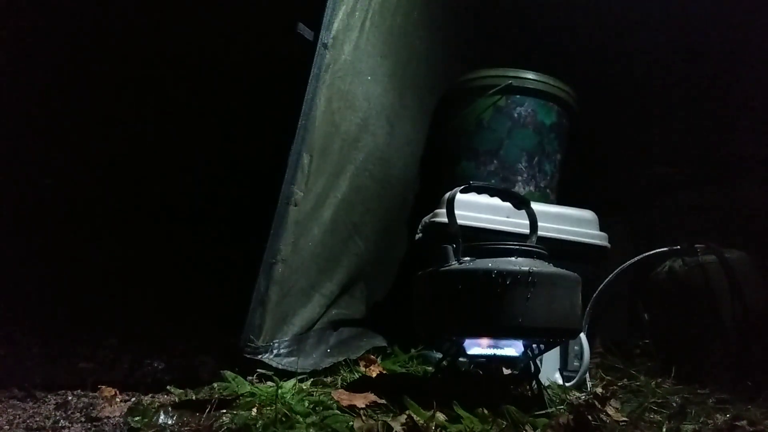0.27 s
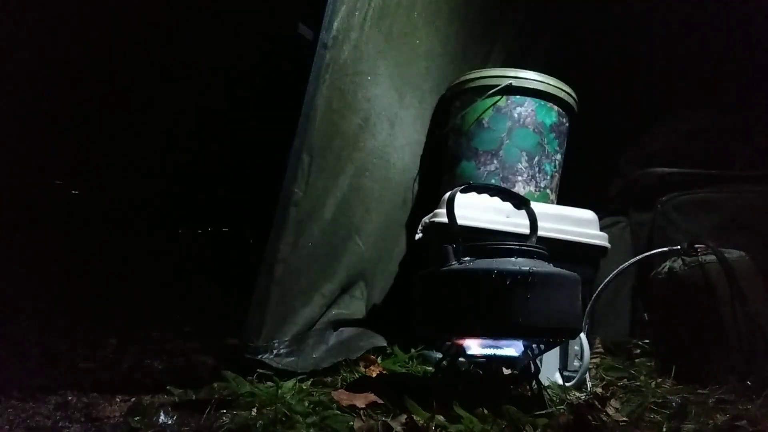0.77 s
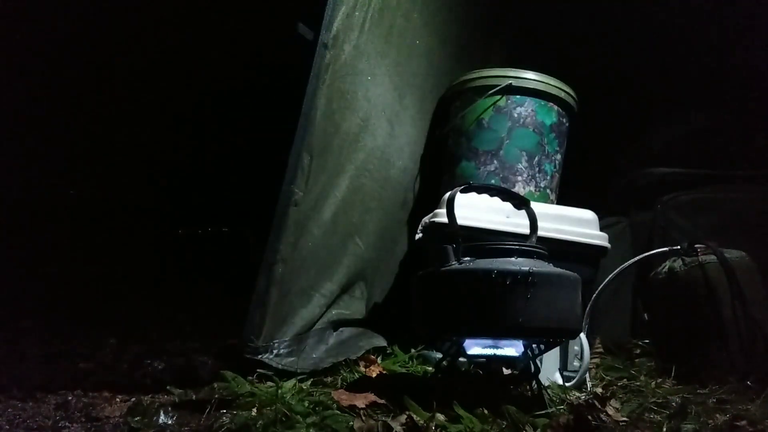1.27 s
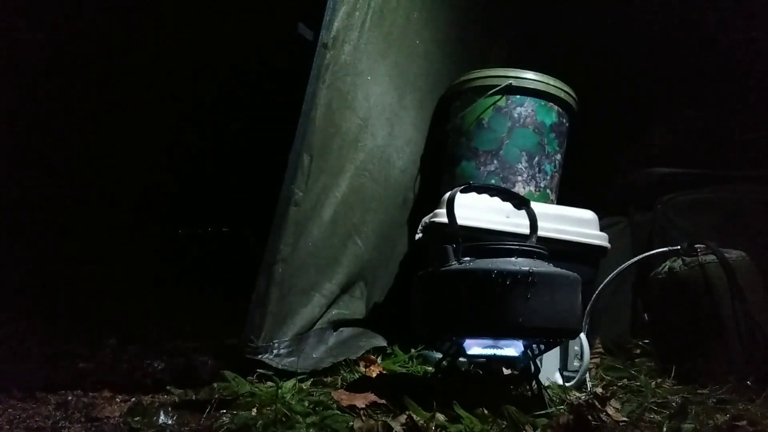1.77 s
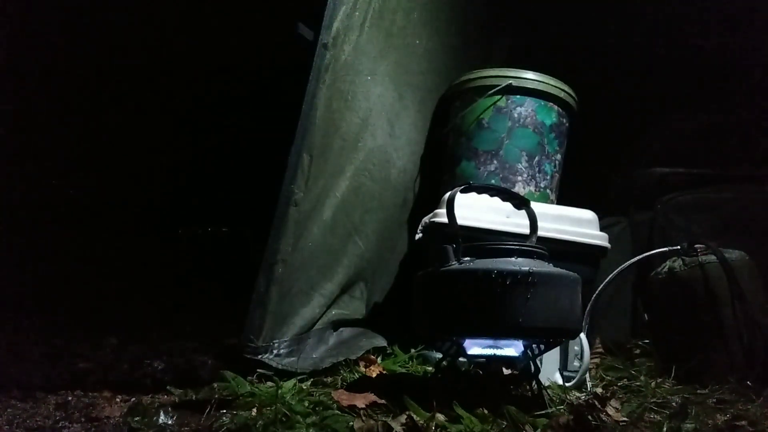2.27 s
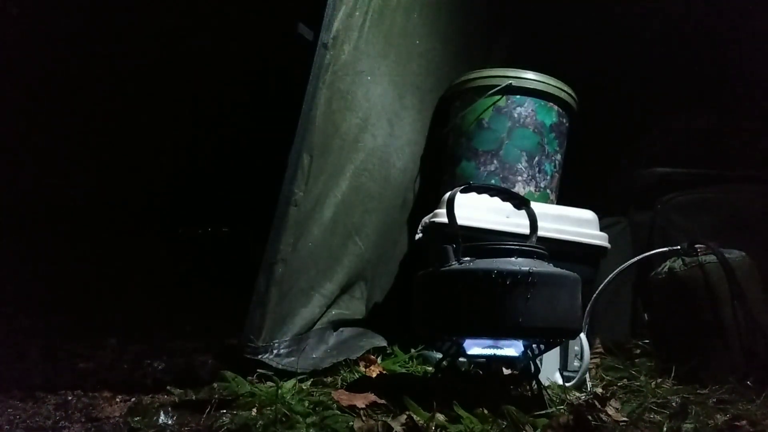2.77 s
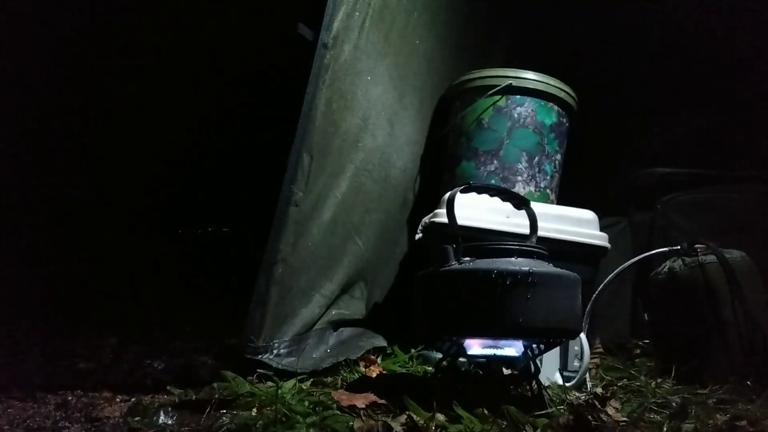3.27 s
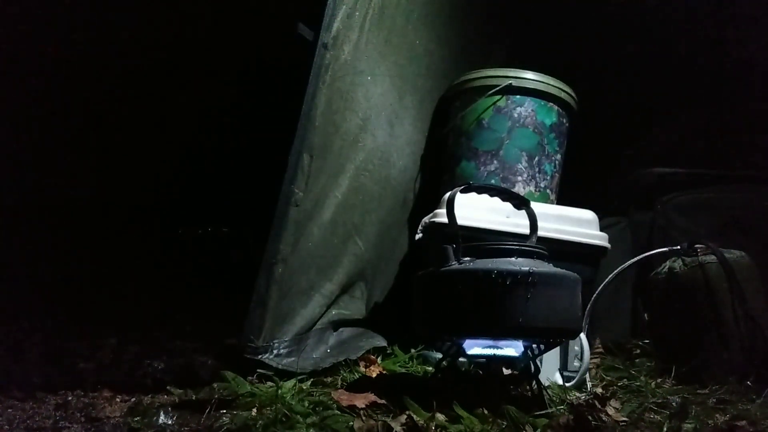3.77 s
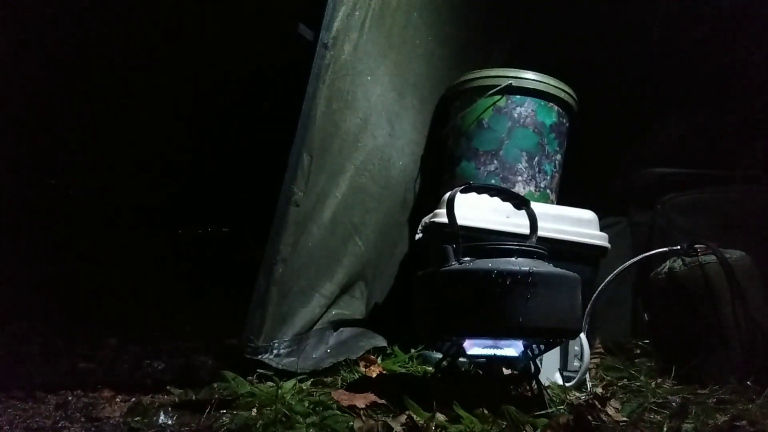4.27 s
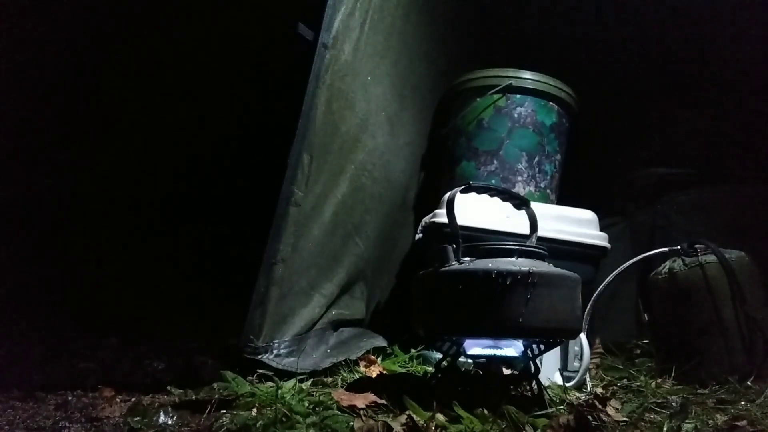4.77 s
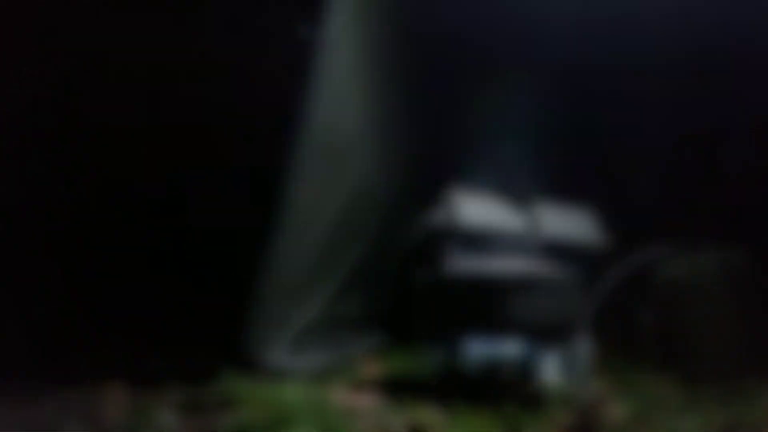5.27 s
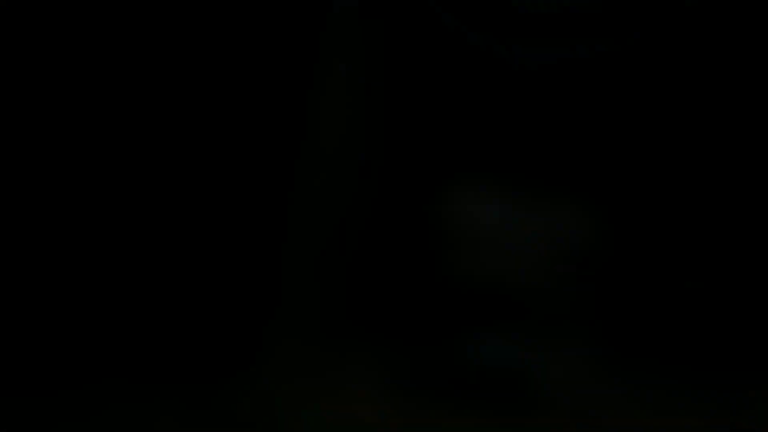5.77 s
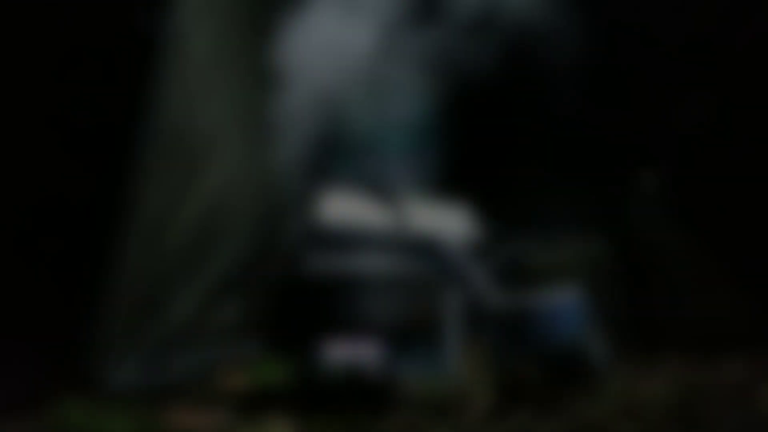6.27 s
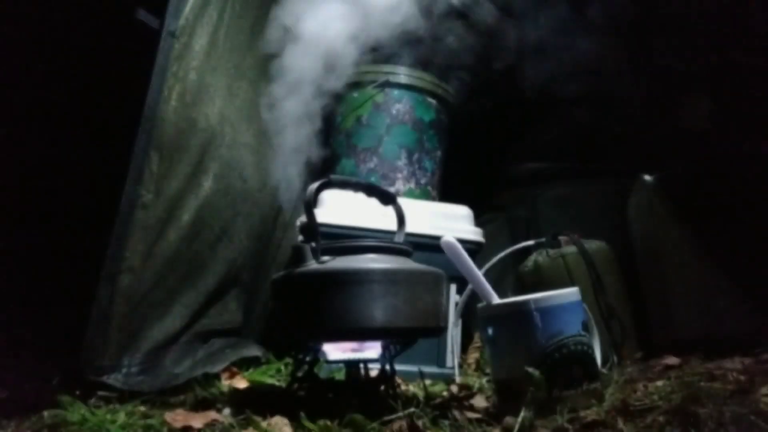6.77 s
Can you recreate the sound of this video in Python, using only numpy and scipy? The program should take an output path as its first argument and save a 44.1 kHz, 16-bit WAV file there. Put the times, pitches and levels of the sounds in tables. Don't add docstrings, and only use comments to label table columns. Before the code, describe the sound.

Outdoors at night, a close stereo microphone hears a small gas flame roaring softly and unevenly under a kettle, with a thin singing gas hiss. Drops hit a taut tarp with short, loud, dull thumps and dry cracks, spit faintly on the hot stand and ping the thin metal. Just before six seconds the hiss stops abruptly and a slightly brighter, steadier roar continues, with one soft late thump.

```python
import sys
import numpy as np
from scipy import signal
from scipy.fft import rfft, irfft, next_fast_len
from scipy.io import wavfile
from scipy.ndimage import uniform_filter1d

SR = 44100
rng = np.random.default_rng(int(sys.argv[2]) if len(sys.argv) > 2 else 0)


def digitize_waveform(pressure):
    field = np.atleast_2d(pressure).T
    bounded = np.clip(field, -1, 1)
    quanta = np.round(bounded * 32767).astype(np.int16)
    wavfile.write(sys.argv[1], SR, quanta)


def level_to_linear(level):
    exponent = np.asarray(level, float) / 20
    return 10 ** exponent


N = 310023
T = np.arange(N) / SR
SIZE = next_fast_len(N + 4096)
HZ = np.maximum(np.arange(SIZE // 2 + 1) * SR / SIZE, 1)
CHANGE_S = 5.922
EARLY = np.clip((CHANGE_S - T) / .004, 0, 1)

# frequency in Hz, level in dB per Hz.
ROAR_EARLY = [(29, -75), (50, -56), (77, -29), (147, -9), (191, -8.5), (269, -4), (359, -6), (436, -3),
              (490, -3.5), (574, -9), (746, -9), (845, -15.5), (983, -17), (1350, -44), (1760, -71.5),
              (2970, -120)]
ROAR_LATE = [(30, -80), (74, -29), (157, -11.5), (258, -3), (312, -8.5), (380, -3), (520, -5), (580, -18.5),
             (680, -10), (900, -10.5), (1050, -23), (1180, -45), (1400, -50), (2500, -100)]
# low roar, upper roar and rumble, all in dB.
FLAME_EARLY = (-33.5, -43.5, -52)
FLAME_LATE = (-34.5, -41, -48.5)
# centre in seconds, half length in seconds, strength in dB.
DRAUGHTS = [
    (.65, 0.16, 5.5),
    (1.353, 0.27, 5.5),
    (2.99, 0.18, 2.5),
    (3.885, 0.16, 8.5),
    (5.277, 0.096, 8.5),
]
ROAR_FOLLOWS, UPPER_FOLLOWS = 0.2, -0.19
# centre in seconds, half length in seconds, upper roar in dB.
SHRINK = (5.47, 0.11, -11.5)

# time in seconds, level in dB.
JET = [(0.0, -69), (0.34, -73), (0.73, -69), (1.05, -71), (1.28, -70.5), (1.42, -68), (3.21, -72.5),
       (3.86, -70), (3.99, -65), (4.54, -71), (5.23, -69), (5.39, -66), (5.75, -70), (5.8, -66)]
# frequency in Hz, width in Hz, level in dB.
JET_PEAKS = [(1517, 180, 1.5), (1820, 270, 0), (2790, 540, -7), (3190, 200, -6), (3645, 175, -4),
             (3970, 270, -1), (4430, 320, 5), (5550, 380, -14.5), (8330, 140, -12), (13150, 500, -20.5)]
LOWER_FOLLOWS, LOWER_DB = 0.7, -73.5

# frequency in Hz, level in dB per Hz.
HISS = [(700, -35), (1300, 5), (2000, 0.5), (5000, -4.5), (9000, -9), (13000, -17), (16000, -24.5)]
# frequency in Hz, level in dB per Hz.
AIR = [(25, -30.5), (45, -40), (70, -8), (110, 9), (160, 10.5), (250, 2.5), (500, 5.5), (1000, -38)]
PORT_LAG_S = 20 / 44100
# frequency in Hz, width in Hz, depth in dB.
SUM_GAPS = [(2259, 188, -23), (4895, 160, -14.5), (6670, 150, -4.5), (9350, 270, -2), (13350, 110, -8.5)]
DIFFERENCE_GAPS = [(1270, 170, -18), (3400, 110, -29.5)]
LATE_SUM_GAPS = [(2260, 200, -26), (4480, 160, -7), (13300, 200, -5)]

# start in seconds,
# peak in dB, then middle, top and air in dB re peak.
SPITS = [(.271, -68, 11.5, -15, -15), (1.222, -71, 15, -17, -17), (1.958, -55, -3, -23, -23),
         (2.243, -54, -15, -13, -10), (2.464, -69, 13.5, 16.5, 14), (2.487, -48.5, -11, -11, -10),
         (2.921, -62.5, 3.5, 12, 9), (3.900, -51, 1, -3, 1), (.746, -49, -4, -8, -14),
         (5.855, -59, 0, -6, -9), (5.920, -49, -3, -10, -10), (4.189, -72, -4, 5, 13.5),
         (4.282, -50, -14, -26, -26), (5.221, -44, -7.5, -24, -18), (5.842, -51, -4, -5, -9),
         (.637, -61, 5, -16, -13), (1.703, -68, -5, -13, -15), (2.1006, -55, -1, -15, -15),
         (2.394, -66, 7, -12, -15), (2.427, -70, 2, 3, 2), (2.7756, -77, -9, -12, -15),
         (3.2191, -68, -8, -10, -14), (3.3677, -69, 2, -12, -16), (5.684, -63, 8, -7, -8)]
SPIT_TAIL_DB, SPIT_TAIL_PER_DB = -2.5, -0.0454
# start in seconds, peak in dB, then middle, top and air in dB re peak.
CRACKS = [(0.5014, -25, -7.5, -18, -21), (0.741, -42, 3, -4, -18), (0.9372, -25, -7.5, -15.5, -17),
          (1.4090, -35.5, -2, -28, -36), (1.4282, -35.5, -2.5, -28, -36), (1.463, -33, -5.5, -25, -31),
          (1.4939, -27, -6.5, -31, -36), (1.8050, -59.5, 6, 19.5, 19), (2.007, -63, -7, -14, -14),
          (2.0218, -31, -5.5, -28, -12), (3.5654, -33, -2.5, -25, -29), (3.8140, -31.5, -4.5, -18, -15),
          (3.8943, -40, 7, 6, 6.5), (5.8320, -43.5, 5, 2, -8)]
CRACK_TAIL_DB, CRACK_TAIL_PER_TOP = -17, -0.065
SPIT_PAN_DB, CRACK_PAN_DB = 1.5, 2.5
TICK_LIKENESS = 0.87
GRAIN_DB, CRACK_GAP_SHARE = 2.5, 0.35

# start in seconds, peak in
# dB, pitch in Hz, left over right in dB, overtone re pitch in dB.
THUMPS = [(.5010, -6, 379, 5, 9), (0.9375, -2.5, 440, 1.5, 10), (.9415, -14.5, 520, 7, 4),
          (.5082, -17.5, 596, 4, 3), (.5122, -19, 480, 17, 1), (1.4283, -21, 560, 6, 13),
          (6.4762, -18, 350, 3, -21), (1.4395, -22.5, 400, 5, 1), (1.4735, -23, 400, 8, 0),
          (5.851, -21, 418, 4, -7), (.9512, -17, 600, 9, 8), (0.9547, -17, 401, 7, -6),
          (0.9567, -15.5, 436, 4, -15), (1.4088, -18.5, 520, 6, 8), (1.463, -20, 436, 6, 6),
          (1.494, -6.5, 443, 5.5, -7), (1.5030, -8, 367, 8, 7), (0.5287, -20, 375, 6, -4),
          (2.0226, -10, 440, 4.5, 4), (2.4887, -16.5, 338, 10, -5), (3.566, -15, 544, 6, 13),
          (3.8136, -11, 378, 3, 5), (3.8190, -16, 449, 11, -9), (3.8365, -17, 397, 6, -3)]
PUSH_HZ, PUSH_DB = 155, -18

# start in seconds, peak in dB, brightness in dB per octave, left over right in dB.
PINGS = [
    (.7402, -40, -8, 7),
    (.745, -43, -8, 7),
    (0.66, -54, -8, 2.5),
    (3.8942, -30.5, 0, -15),
    (3.8958, -41, -1, -7),
    (5.832, -49, 2, .5),
    (2.0225, -34, -10, 5),
    (2.9225, -56, 6, 4),
]
# frequency in Hz, level in dB, t60 in seconds.
WALL = [(2780, 5, 0.02), (3110, 0, .012), (4050, -10, 0.0098), (5390, -0.5, 0.013), (5600, -13, 0.01),
        (7750, -11, .01), (8600, -17, 0.01), (11900, -18, .006)]

# start and end in seconds, level in dB, share switched off, echo in dB, tick length in seconds.
BUZZ = [
    (3.63175, 5.92, -49, .48, -20, .00015),
    (5.92405, 7.03, -58.5, 0.0, -9, .00028),
]
BUZZ_PERIOD_S, PAIR_S, BUZZ_HZ = .008, 20 / 14870, 15200
# centre in seconds, half length in seconds, pitch in Hz, level in dB.
HUM = [
    (3.7, 0.044, 152, -44.5),
    (3.83, 0.11, 160.8, -48.5),
    (4.097, 0.089, 150.5, -43.5),
]


def rms_one(x):
    return x / np.sqrt(np.mean(x ** 2) + 1e-20)


def over_hz(points):
    hz, db = np.transpose(points)
    return level_to_linear(np.interp(np.log(HZ), np.log(hz), db))


def swell(s, half):
    return np.exp(-((T - s) / half) ** 2)


def drift(rate):
    r = np.exp(-80 * np.pi * rate / SR)
    slow = signal.lfilter([1], [1, -2 * r, r * r], rng.standard_normal(N // 40 + 2002))[2000:]
    return np.interp(np.arange(N) / 40, np.arange(len(slow)), rms_one(slow))


def turbulence(gain, centres, together_db, own_db, rate):
    bins = rfft(rng.standard_normal(SIZE)) * gain / np.sqrt(np.mean(gain ** 2))
    shared = together_db * drift(rate)
    bands = []
    for one in np.eye(len(centres)):
        share = np.interp(np.log(HZ), np.log(centres), one)
        bands.append(irfft(bins * share, SIZE)[:N] * level_to_linear(shared + own_db * drift(rate)))
    return np.array(bands)


def ring(x, hz, t60):
    r, w = level_to_linear(-60 / (t60 * SR)), 2 * np.pi * hz / SR
    return signal.lfilter([0, np.sin(w)], [1, -2 * r * np.cos(w), r * r], x)


def ports(left, right_low_db, right_high_db):
    bass_turn = 2.3 * np.clip((HZ - 1450) / 400, 0, 1)
    turn = np.where(HZ < 2500, bass_turn, np.pi - 2 * np.pi * HZ * PORT_LAG_S)
    tilt = over_hz([(700, right_low_db), (1200, right_high_db)])
    return np.array([left, irfft(rfft(left, SIZE) * tilt * np.exp(1j * turn), SIZE)[:N]])


def through_ports(track, low_db, high_db):
    return np.array([track[0], ports(track[1], low_db, high_db)[1]])


def dark_bands(steady, sum_gaps, depth):
    gains = []
    for gaps in (sum_gaps, DIFFERENCE_GAPS):
        gap_db = sum(db * np.exp(-((HZ - hz) / width) ** 4) for hz, width, db in gaps)
        gains.append(level_to_linear(depth * gap_db))
    both = rfft([steady[0] + steady[1], steady[0] - steady[1]], SIZE)
    mid, side = irfft(both * gains, SIZE)[:, :N] / 2
    return np.array([mid + side, mid - side])


def add(track, s, sound, pan_db):
    i = round(s * SR)
    track[:, i:i + sound.shape[-1]] += sound[..., :N - i] * level_to_linear([[pan_db / 2], [-pan_db / 2]])


def flame():
    draught_db = sum(db * swell(s, half) for s, half, db in DRAUGHTS)
    low_db, upper_db, rumble_db = [np.where(T < CHANGE_S, a, b) for a, b in zip(FLAME_EARLY, FLAME_LATE)]
    low_db = low_db + ROAR_FOLLOWS * draught_db
    rumble_db = rumble_db + draught_db
    upper_db = upper_db + UPPER_FOLLOWS * draught_db + SHRINK[2] * swell(*SHRINK[:2])
    centres = np.geomspace(70, 1300, num=9)
    upper_share = np.clip(np.log2(centres / 500), 0, 1)[:, None]
    rumble_share = np.clip(np.log2(280 / centres), 0, 1)[:, None]
    upper_lift = (upper_db - low_db + 7.5) * upper_share
    rumble_lift = (rumble_db - low_db + 14.5) * rumble_share
    gain = level_to_linear(low_db + 3.5 + upper_lift + rumble_lift)
    early, late = [(turbulence(over_hz(color), centres, 1.87, 0.4, 28) * gain).sum(axis=0)
                   for color in (ROAR_EARLY, ROAR_LATE)]
    return EARLY * ports(early, -6.5, -2.3) + (1 - EARLY) * ports(late, -2.7, -4.5) * level_to_linear(-0.64)


def jet():
    upper_db = np.interp(T, *np.transpose(JET))
    lower_db = LOWER_DB + LOWER_FOLLOWS * (upper_db - upper_db.mean())
    power = sum(level_to_linear(2 * db) / (1 + (2 * (HZ - hz) / width) ** 2) ** 2 for hz, width, db in JET_PEAKS)
    centres = [1300, 1520, 1700, 1900, 2400, 2650, 2900, 3150, 3450, 3700, 4000, 4400]
    patches = turbulence(np.sqrt(power) * (HZ < 4200), centres, 0.67, 5.5, 11.3)
    whistle = turbulence(np.sqrt(power) * (HZ >= 4200), [4400, 5500, 9000], .5, 1, 5)
    low = patches[:4].sum(axis=0) * level_to_linear(lower_db + 6.5)
    high = patches[4:].sum(axis=0) * level_to_linear(4.0) + whistle.sum(axis=0) * level_to_linear(7.0)
    pair = ports(low + high * level_to_linear(upper_db), -1.5, -2.4)
    pair[1] += level_to_linear(-12.5) * np.roll(pair[1], 1500)
    return pair * EARLY


def capsule_hiss():
    left, right, common = [turbulence(over_hz(HISS), [100, 8000], .1, .1, 3).sum(axis=0) for _ in range(3)]
    air = np.array([turbulence(over_hz(AIR), [60, 300], 3.44, 1.7, 9.7).sum(axis=0) for _ in range(2)])
    hiss = np.array([left, right]) + 0.73 * ports(common, .1, .1)
    return level_to_linear(-71.0) * hiss + level_to_linear([[-46], [-48]]) * air


def spits_and_cracks():
    (track, tails), click = np.zeros((2, 2, N)), np.eye(1, 9000)[0]
    age = np.arange(9000) / SR
    edges = [1000, 2300], [2350, 4650], [5000, 6300], [6300, 9200], [9200, 13000]
    bands = [signal.butter(3, pair, "band", fs=SR, output="sos") for pair in edges]
    ticks = [(*row, SPIT_PAN_DB, SPIT_TAIL_DB + SPIT_TAIL_PER_DB * (row[1] + 60)) for row in SPITS]
    ticks += [(*row, CRACK_PAN_DB, CRACK_TAIL_DB + CRACK_TAIL_PER_TOP * (row[3] + 10)) for row in CRACKS]
    for s, db, middle_db, top_db, air_db, pan_db, tail_db in ticks:
        left, other, lumps = rng.standard_normal((3, 9000))
        right = TICK_LIKENESS * left + np.sqrt(1 - TICK_LIKENESS ** 2) * other
        noise = np.array([left, right])
        splinters = level_to_linear(-60 * age / 0.019 - 11.5)
        grain = level_to_linear(GRAIN_DB * rms_one(uniform_filter1d(lumps, size=50)) + 2.0)
        gate = (1 - np.exp(-age / 0.0012)) * np.exp(-(age / 0.32) ** 4) * grain
        fade = level_to_linear(tail_db - 7.0 - 60 * age / 0.36) * gate
        levels = (db + 3.0, db + middle_db + 3.0, db + top_db + 1.0, db + air_db - 2.5, db + air_db - 10.5)
        crack = tail = 0
        for band, band_db in zip(bands, levels):
            snap = signal.sosfilt(band, click)
            gain = level_to_linear(band_db)
            norm = np.sqrt(np.sum(snap ** 2))
            crack = crack + gain * (signal.sosfilt(band, splinters * noise) / norm - snap / snap.max())
            tail = tail + gain * signal.sosfilt(band, fade * noise) / norm
        add(track, s, crack, pan_db)
        add(tails, s, tail, pan_db)
    return [through_ports(x, 0.084, 0.082) for x in (track, tails * EARLY)]


def thumps():
    cloth, click = np.zeros((2, N)), np.eye(1, 9000)[0]
    soft = signal.butter(2, [190, 1400], "band", fs=SR, output="sos")
    slack = signal.butter(2, [75, 330], "band", fs=SR, output="sos")
    push = level_to_linear(PUSH_DB) * signal.sosfilt(slack, ring(click, PUSH_HZ, 0.014))
    for s, db, hz, pan_db, overtone_db in THUMPS:
        body = ring(click, hz, 9.9 / hz) + level_to_linear(overtone_db) * ring(click, 1.55 * hz, 0.0072)
        body = signal.sosfilt(np.vstack([soft, soft]), -body)
        add(cloth, s, level_to_linear(db - 4.0) * (body / np.abs(body).max() + push), pan_db)
    return through_ports(cloth, 0.084, 0.082)


def kettle():
    track, age = np.zeros((2, N)), np.arange(4000) / SR
    contact = level_to_linear(-60 * age / 0.0089)
    for s, db, slope_db, pan_db in PINGS:
        sound = 0
        for hz, level_db, t60 in WALL:
            mode = rms_one(ring(rng.standard_normal(4000) * contact, hz, t60))
            sound = sound + level_to_linear(level_db + slope_db * np.log2(hz / 2790)) * mode
        add(track, s, level_to_linear(db) * sound / np.abs(sound).max(), pan_db)
    return through_ports(track, .1, .1)


def buzz():
    out, offset = np.zeros(N + 200), np.arange(-40, 40)
    fizz_band = signal.butter(3, [13200, 15600], "band", fs=SR, output="sos")
    for start, end, db, off, echo_db, length in BUZZ:
        times = np.arange(start, end, BUZZ_PERIOD_S)
        state = uniform_filter1d(rng.standard_normal(len(times)), size=2)
        gain = level_to_linear(db - 9.5 * (state < np.quantile(state, off)))
        slip = off * 1.5e-5 * rng.standard_normal(len(times))
        fizz = signal.sosfilt(fizz_band, rng.standard_normal(N))
        out[:N] += off * level_to_linear(-5.0) * fizz * np.interp(T, times, gain, left=0, right=0)
        for step in range(-1, 3):
            at = (times + slip + step * PAIR_S) * SR
            age = (np.round(at) - at)[:, None] + offset
            tick = np.exp(-(age / (length * SR)) ** 2) * np.cos(2 * np.pi * BUZZ_HZ / SR * age)
            weight = (-1.) ** step * level_to_linear(echo_db * (step not in (0, 1)))
            np.add.at(out, np.round(at).astype(int)[:, None] + offset, tick * gain[:, None] * weight)
    return ports(out[:N], -2.5, -2.6)


def hum():
    out = 0
    for s, half, hz, db in HUM:
        phase = 2 * np.pi * np.cumsum(hz + 2.89 * drift(7.0)) / SR
        out = out + level_to_linear(db + 10.5) * swell(s, half) * np.sin(phase)
    return ports(out, -8.0, -2.1)


def scene():
    steady = flame() + jet() + capsule_hiss()
    cracks, tails = spits_and_cracks()
    rest = dark_bands(cracks, SUM_GAPS, CRACK_GAP_SHARE) + thumps() + kettle() + buzz() + hum()
    deep = np.clip(0.6 + 0.45 * drift(5.0), 0, 1)
    hissing = steady + tails
    early = deep * dark_bands(hissing, SUM_GAPS, 1.2) + (1 - deep) * dark_bands(hissing, SUM_GAPS, 0.72)
    late = dark_bands(steady, LATE_SUM_GAPS, 0.91)
    return EARLY * early + (1 - EARLY) * late + rest


def top_cut(x):
    return signal.sosfilt(signal.butter(12, 16210, fs=SR, output="sos"), x)


def record(dry):
    top = signal.ellip(10, .5, 60, 15540, fs=SR, output="sos")
    mix = signal.sosfilt(top, dry)
    return top_cut(mix)


dry = scene()
out = record(dry)
digitize_waveform(out)
```